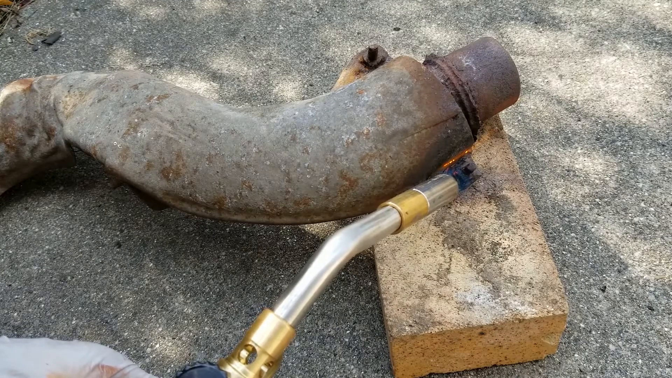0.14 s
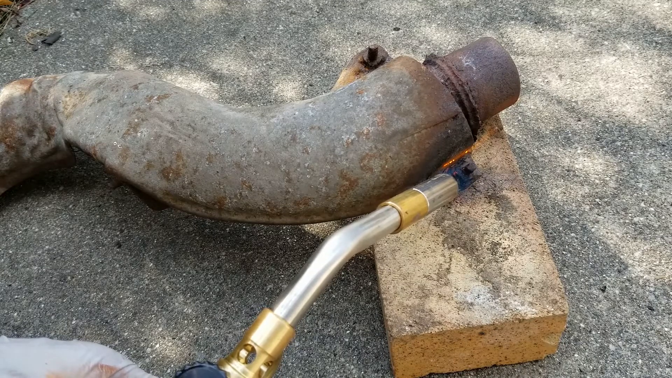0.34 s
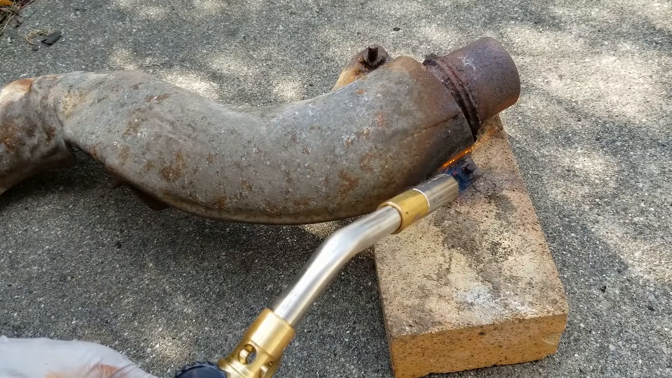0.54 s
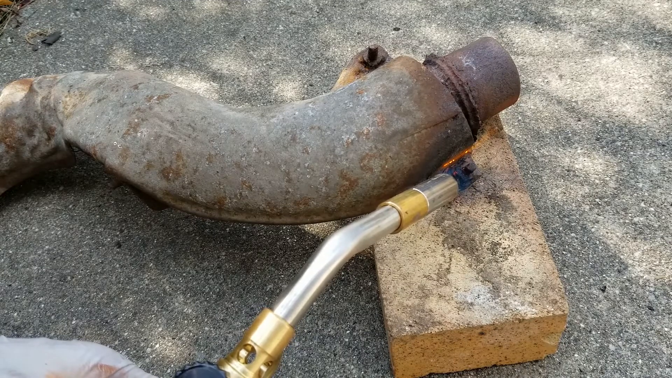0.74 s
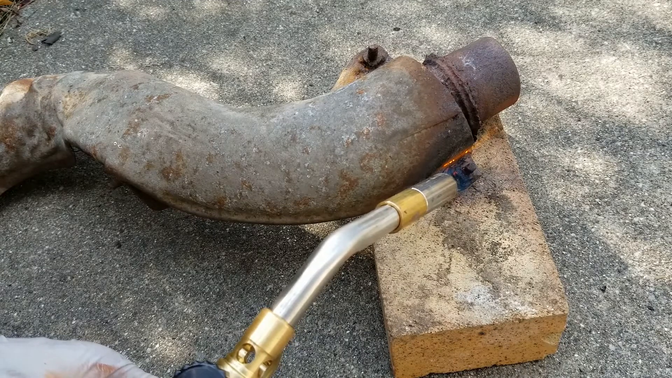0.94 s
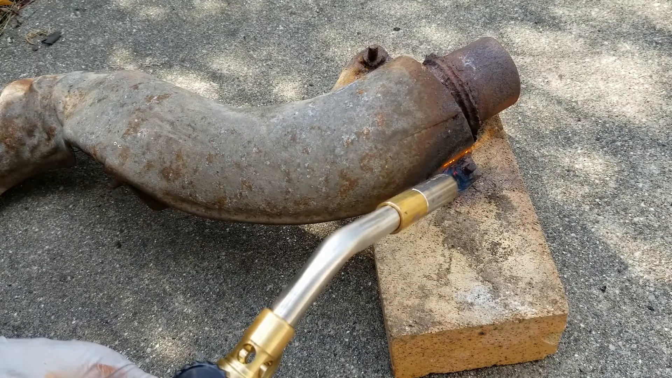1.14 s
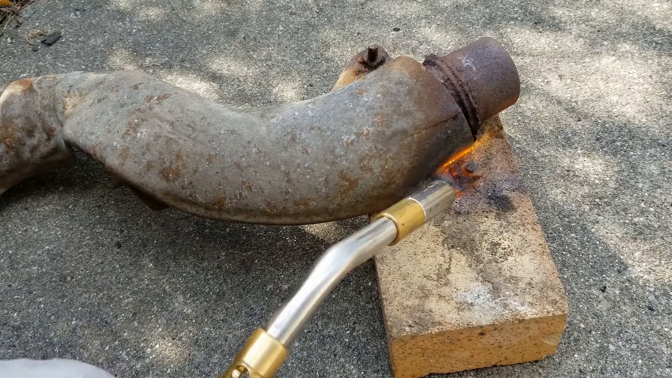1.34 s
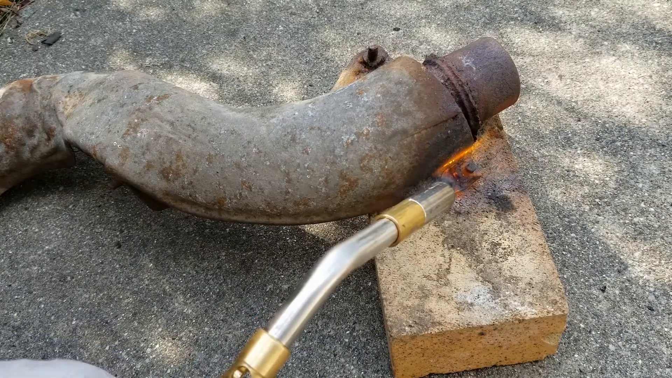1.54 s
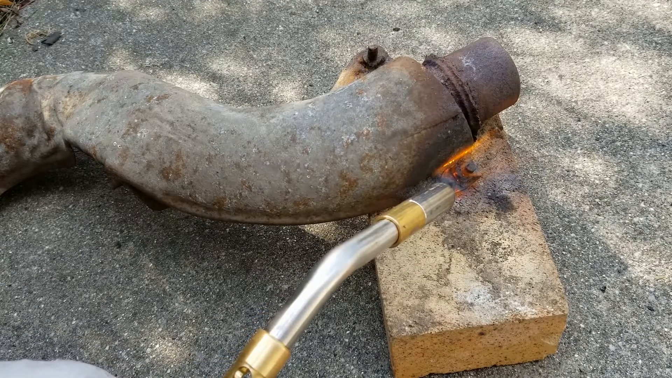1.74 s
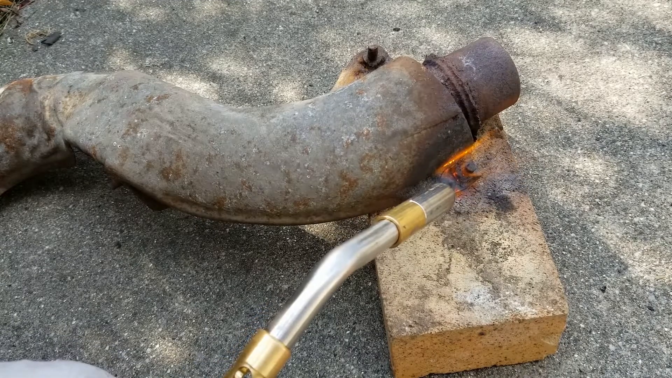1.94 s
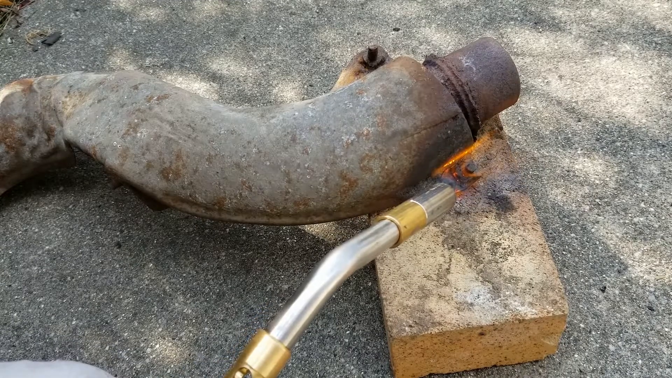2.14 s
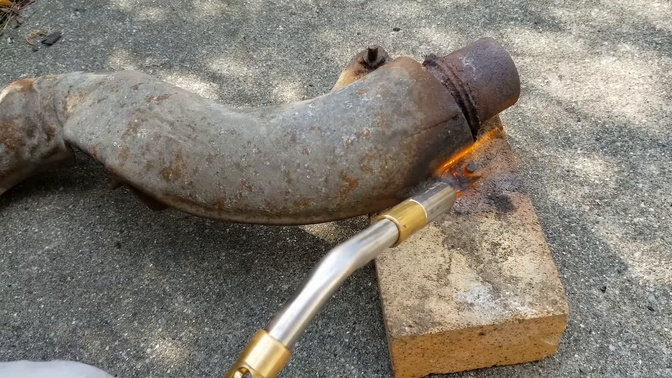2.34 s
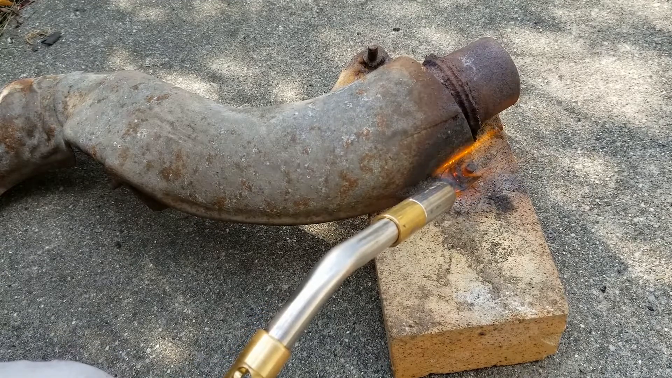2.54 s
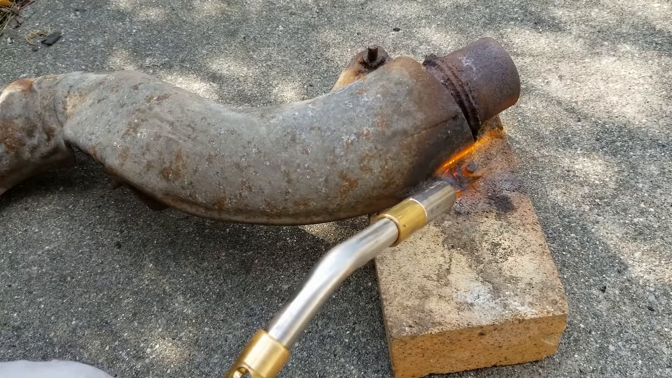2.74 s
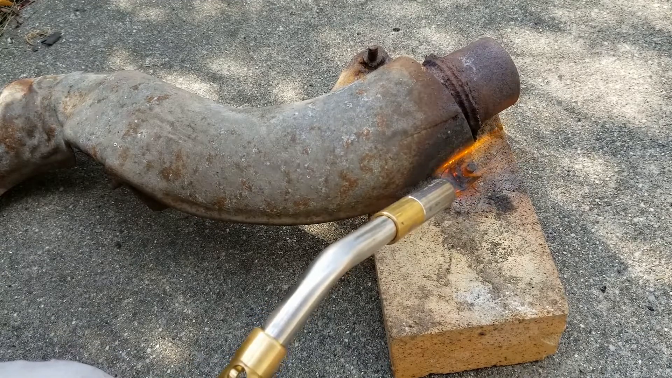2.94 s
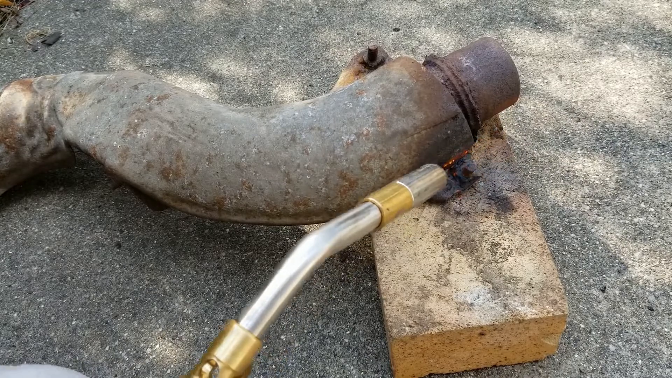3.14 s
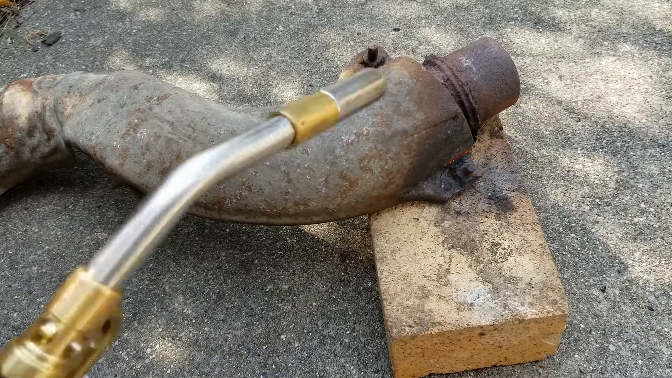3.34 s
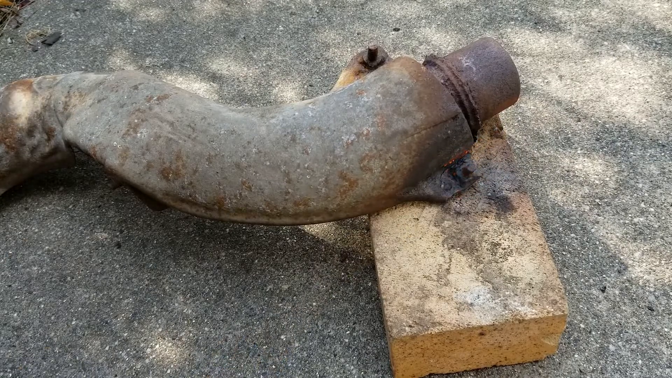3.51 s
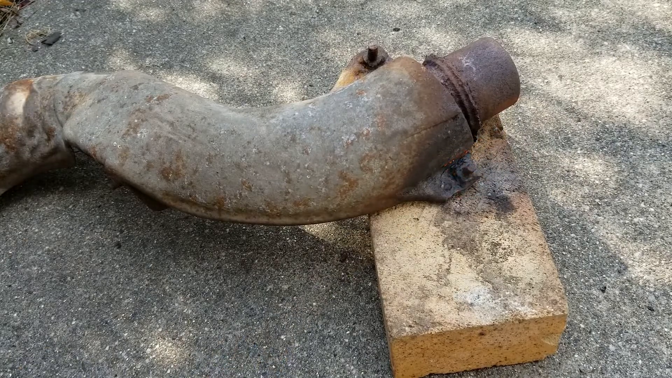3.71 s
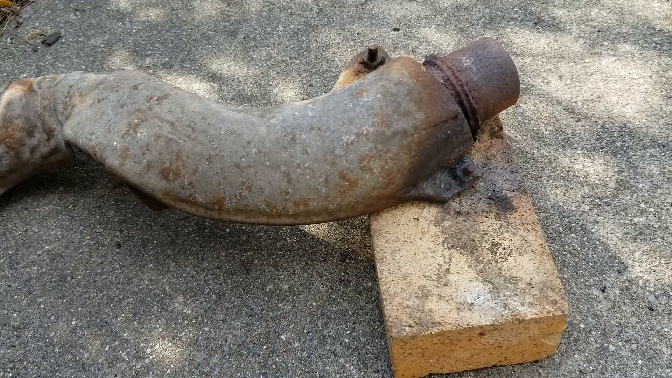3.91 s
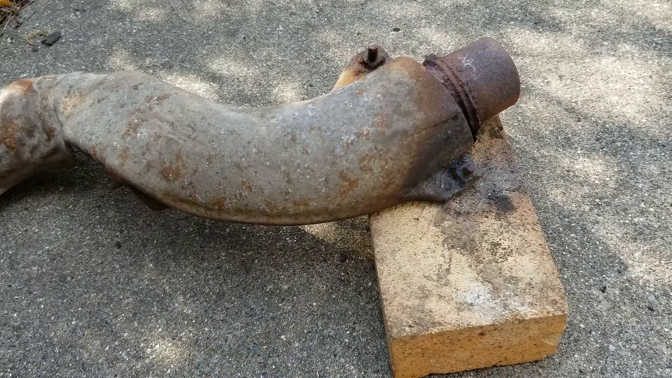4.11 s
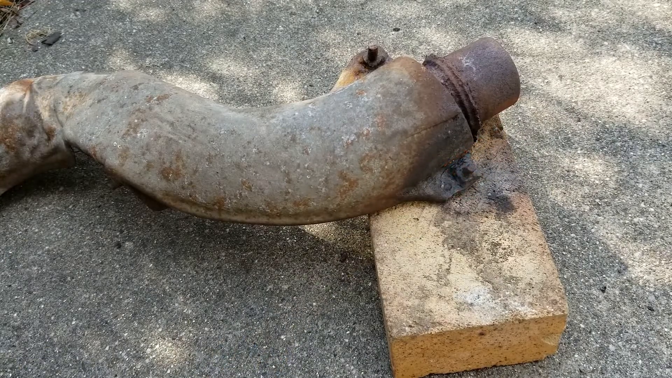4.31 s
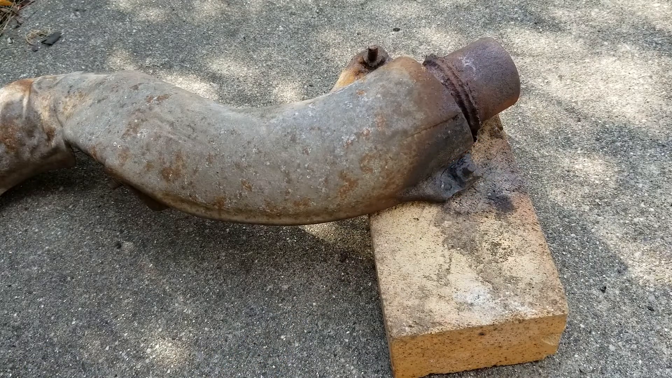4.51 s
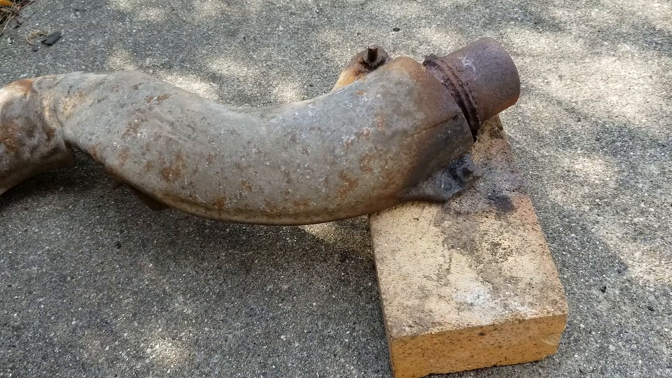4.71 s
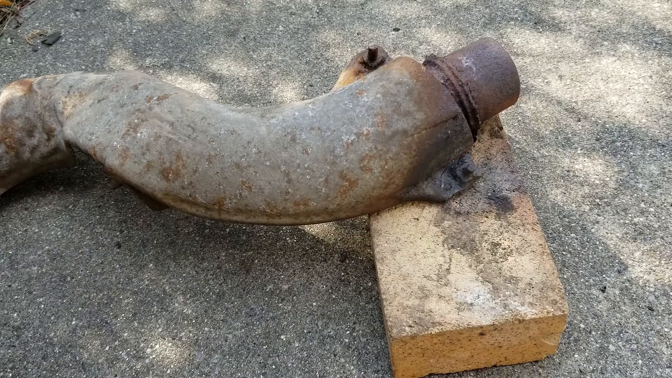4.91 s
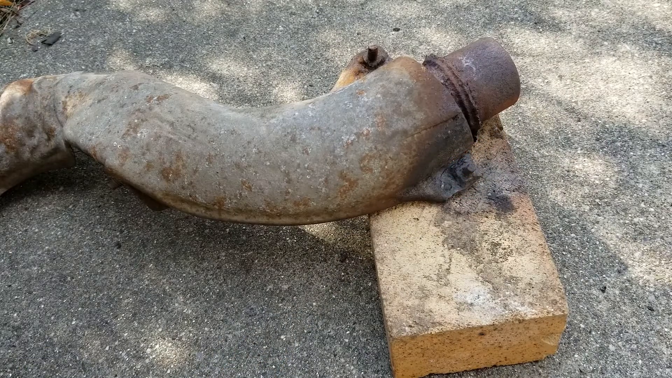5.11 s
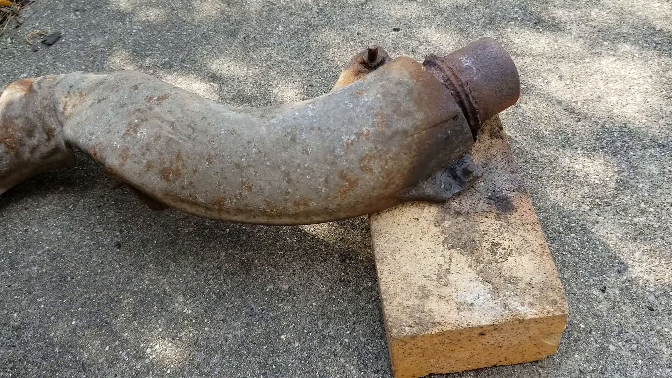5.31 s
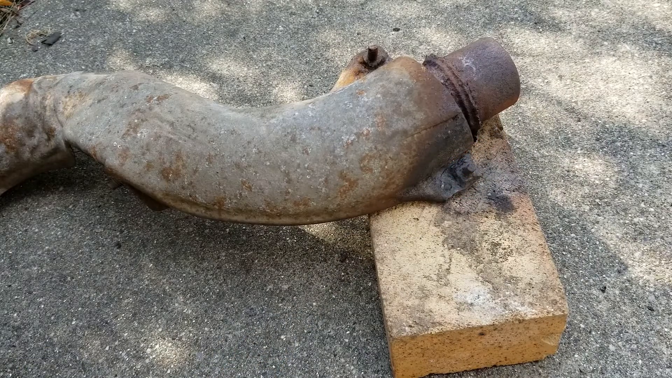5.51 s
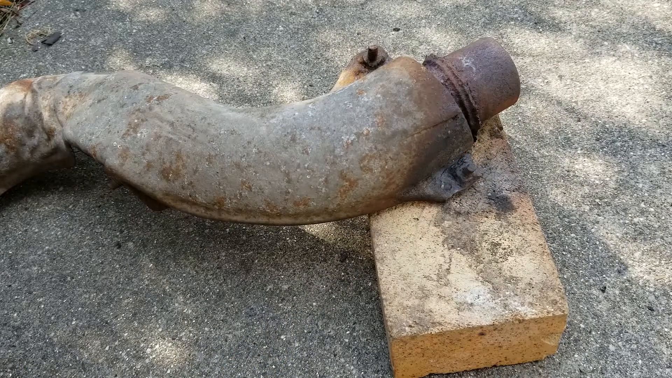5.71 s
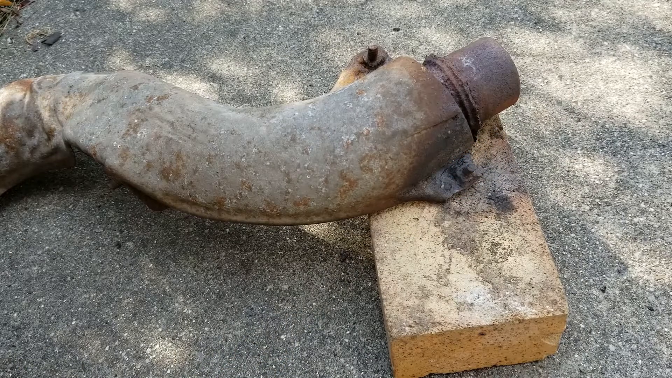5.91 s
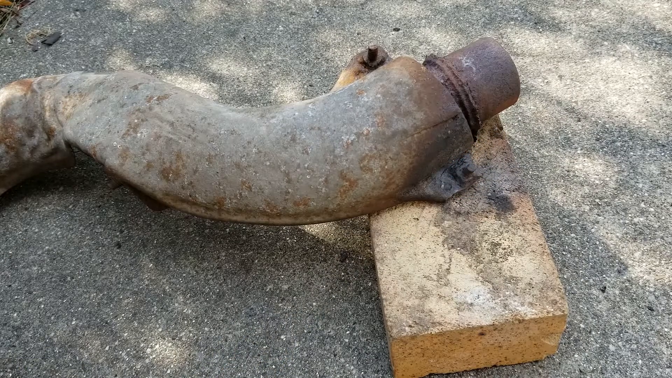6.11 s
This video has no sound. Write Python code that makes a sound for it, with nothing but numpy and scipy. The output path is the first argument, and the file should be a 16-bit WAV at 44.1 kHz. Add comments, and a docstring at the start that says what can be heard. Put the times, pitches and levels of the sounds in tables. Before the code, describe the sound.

From the start, a handheld gas torch burns close to a stereo microphone outdoors, with a hollow roar and a bright, steady hiss. From about 1.4 seconds the hiss shifts in colour as the jet splashes off a rusted bolt, and the roar eases slightly. Just after 3 seconds the valve closes and the sound falls away quickly. The trigger gives a dry click at 3.2 seconds, and the last gas pops in the tube with a very short whistle around 3.3 seconds. A quiet yard remains, with faint chirping insects, a few soft high rustles and the low hum of a distant machine. Between 5.1 and 5.5 seconds the torch is put aside, slightly left, with a few light clacks and a faint scrape. The background swells gently and continues to the end, just after 6 seconds.

```python
"""A handheld gas torch roars and hisses on a rusted bolt, outdoors, close to a stereo microphone.
Turbulent burning rings the burner tube while the gas jet splashes off the steel. The valve closes,
the trigger clicks and the last gas pops in the tube with a short whistle. Insects and a distant
machine remain in the yard, and the torch is put aside with a few light clacks and a scrape."""
import sys
import numpy as np
from scipy import signal
from scipy.fft import rfft, irfft, next_fast_len
from scipy.io import wavfile
from scipy.ndimage import uniform_filter1d, map_coordinates

SR = 44100
rng = np.random.default_rng(int(sys.argv[2]) if len(sys.argv) > 2 else 0)


def output_pcm(signal):
    """Save a mono or channel-first signal as 16-bit PCM at the path in sys.argv[1].

    Samples are clipped to [-1, 1] before scaling.
    """
    pcm = np.clip(np.atleast_2d(signal).T, -1, 1) * 32767
    wavfile.write(sys.argv[1], SR, np.round(pcm).astype(np.int16))


N = 271207

# Far rumble, open air and high rustling. Each row: frequency in Hz, relative level in dB.
RUMBLE_SPECTRUM = [(20, -29.5), (40, -6), (70, 0.5), (130, -3.5), (210, -6), (280, -14), (400, -21.5),
                   (700, -52)]
AIR_SPECTRUM = [(150, 4.5), (600, 0.5), (1250, -2.5), (1700, 3), (2050, -1), (2400, -13), (3500, -17.5),
                (5300, -9.5), (7300, -12.5), (10200, -18.5), (14000, -17), (15700, -15.5)]
RUSTLE_SPECTRUM = [(2000, -8.5), (7000, -13), (10300, -4.5), (11300, -1.5), (14000, -6.5)]
# The air at the two microphones. Each row: frequency in Hz, likeness from -1 to 1.
AIR_LIKENESS = [(200, 0.77), (800, 0.17), (1500, -0.33), (6400, -.1), (7100, 1), (15000, 0.94)]
# Where the air sits. Each row: frequency in Hz, left over right in dB.
AIR_BALANCE = [(950, 0), (1700, 16), (2050, 15), (2500, 3), (5000, 1), (6200, -7.5), (7000, -0.5)]
# A distant machine. Each row: pitch in Hz, rms level in dB before the swell.
MACHINE_HUM = [(57, -54), (118.4, -61)]
# Faint tones far off. Each row: start in seconds, end in seconds, pitch in Hz, typical level in dB.
DISTANT_TONES = [(3.31, 3.846, 295, -63), (5.08, 5.65, 902, -75), (5.417, 6.084, 409.6, -68.5)]
# The insect chorus. Each row: pitch in Hz, width in Hz, relative level in dB.
CHORUS_VOICES = [(8270, 320, -5), (8600, 240, -4.5), (8830, 220, -3.5), (9270, 260, -5)]
# Thin insect trills. Each row: pitch in Hz, typical level in dB once they have risen.
INSECT_TRILLS = [(6130, -79), (7833, -84)]
# One insect's bouts of even chirping. Each row: start in seconds, end in seconds.
CHIRP_BOUTS = [(3.392, 3.95), (4.105, 6.15)]
# A higher insect's buzz. Each row: middle in seconds, length in seconds, level in dB.
INSECT_BUZZES = [(6.1, .24, -67)]
# Faint rustles. Each row: crest in seconds, level in dB, fade in dB per second.
RUSTLE_EVENTS = [(3.42, -64, 109.5), (3.91, -69, 139.5), (4.08, -61, 47), (4.43, -71, 69.5),
                 (6.03, -66.5, 13.5)]

# The torch put aside. Each row: start in seconds, level in dB, low cut in Hz, high cut in Hz,
# left over right in dB, echo in dB, share of the full ring time.
HANDLING_CLACKS = [(5.1112, -34.5, 700, 3000, 4.5, -1, .9), (5.1902, -27, 1350, 15000, 3.5, -2, 0.9),
                   (5.2708, -38.5, 2400, 5000, 4, 1, 0.6), (5.386, -43, 1200, 4800, 5, 0, 0.2),
                   (5.405, -38.5, 2700, 6500, 2, -9, 0.3)]
# The trigger springs back and seats. Each row: start in seconds, level in dB, high cut in Hz.
TRIGGER_CLICKS = [(3.2003, -28, 4800), (3.2014, -26.5, 15040)]
# How the torch body, the trigger's small parts and the popped tube ring.
# Each row: frequency in Hz, relative level in dB, seconds to fall 60 dB.
BODY_MODES = [(1540, -1, .024), (1780, 1.5, .018), (2020, 2.5, .018), (2330, -2, .025), (2580, -6, .03),
              (3000, -8, .016), (4350, -13, .01), (6450, -10, .04), (6900, -9, .05), (8330, -9, .06),
              (10300, -14, .05), (12100, -12, .05), (13900, -16, .03)]
TRIGGER_MODES = [(1900, 2, .008), (2400, -1, .012), (3150, 0, .008), (4400, 0, 0.007), (8200, -4, .008),
                 (10900, -3, .007), (12400, -4, .006), (14900, 0, .007)]
TUBE_MODES = [(1090, 4, 0.016), (2580, -3.5, 0.046), (3720, -4, 0.021), (5200, -9, 0.012),
              (6160, -10.5, 0.0098)]
# The dying flame's pops. Each row: start in seconds, then base levels of thump, ring and puff in dB.
FLAME_POPS = [(3.1497, -36, -48, -45), (3.254, -26.5, -36.5, -44), (3.265, -45, -66, -36),
              (3.2945, -35, -57, -43)]
# The tube's whistles. Each row: start in seconds, length in seconds, middle pitch in Hz, level in dB.
TUBE_WHISTLES = [(3.252, 0.015, 1285, -37), (3.263, 0.036, 1342, -34)]

# The torch moving over the bolt. Each row: time in seconds, tube level in dB, hiss level in dB.
TORCH_LEVELS = [(0.1, -22.5, -31.5), (1.25, -22.5, -30.5), (1.6, -24.5, -33.5), (1.85, -23.5, -33.5),
                (2.1, -27.5, -37.5), (2.25, -25.5, -35), (2.5, -26, -32.5), (2.73, -26.5, -33.5),
                (2.84, -27, -38), (2.95, -30, -37)]
# Brief flares. Each row: middle in seconds, length in seconds, flame boost in dB, gas boost in dB.
FLAME_FLARES = [(1.364, 0.056, 2.5, 2.5), (3.031, 0.0883, 3, 0)]
# The nozzle's aim. Each row: time in seconds, share of the jet that splashes off the steel.
SPLASH_SHARE = [(1.33, 0.07), (1.45, 0.4), (2.15, 0.55), (2.78, 0.6), (2.88, 0.4), (3.03, 0.98)]
# Low roar, free jet and splashing jet. Each row: frequency in Hz, relative level in dB.
ROAR_SPECTRUM = [(20, -40.5), (60, -15.5), (100, -8), (140, -1), (230, 0), (450, -2), (700, -2.5),
                 (1050, -3.5), (1500, -3.5), (2300, -6.5), (2700, -6.5), (3700, -18.5), (4400, -28.5),
                 (8000, -44)]
HISS_SPECTRUM = [(1500, -22.5), (3000, 11.5), (4000, 1), (4750, 10), (5500, 5.5), (6400, 1), (7100, -11.5),
                 (7750, 5.5), (8700, -1), (10700, 1.5), (11500, -9), (12400, -7), (12950, -2), (14000, -8),
                 (15600, -2.5)]
SPLASH_SPECTRUM = [(2000, -23), (3900, 4.5), (4900, 12), (5600, 3), (6700, 4.5), (7400, -0.5), (8400, 2.5),
                   (9500, 4), (10700, -5), (12200, 0), (13400, 0.5), (14200, -2.5), (15600, 0.5)]
# Resonances of the burning gas in the tube. Each row: frequency in Hz, width in Hz, relative level in dB.
BURNER_RESONANCES = [(826, 100, -3), (1295, 55, -4), (1750, 104, 0.5), (1864, 530, -3), (2120, 200, 0.5),
                     (2277, 130, -1.5), (2640, 80, -6), (3380, 99, -17), (3727, 110, -13.5)]
# The torch at the two microphones. Each row: frequency in Hz, likeness from -1 to 1.
TORCH_LIKENESS = [(130, .998), (400, .98), (2200, .96), (3200, .85), (5000, .88), (6100, .5), (7800, .85),
                  (11500, .6), (15000, .7)]
# Where torch and splash sit, the splash mostly right. Each row: frequency in Hz, left over right in dB.
TORCH_BALANCE = [(200, .3), (380, -.5), (700, -3), (1290, 1.7), (2200, -.5), (3050, -6), (3650, 2),
                 (4800, -2), (6100, -9), (7100, -1.5), (8500, -5.5), (10500, .5), (15000, .7)]
SPLASH_BALANCE = [(4000, 2), (4900, -1), (5900, -10), (6800, -12), (8400, -9), (9600, -4), (11000, 3),
                  (13300, -1.5)]
# The torch's phase across the pair. Each row: frequency in Hz, lead of the left microphone in radians.
TORCH_PHASE = [(180, 0), (480, -.45), (950, .1), (1700, -1.1), (2000, -.8), (2600, -1.6), (3050, -1.3),
               (3350, .6), (4200, -1.7), (4800, -2.8), (5350, -3.2), (5900, -4.6), (6500, -6.28)]
# The nozzle's distance from the steel sets the band that cancels between the microphones.
# Each row: time in seconds, frequency in Hz, depth in dB.
NOZZLE_NOTCH = [(1.36, 5440, 0), (1.499, 5170, 6), (1.85, 5270, 6.5), (2.03, 4364, 6.5), (2.4, 4880, 9),
                (2.65, 5070, 8.5), (2.95, 5600, 2)]
# Hollows between nozzle, bolt and pipe ring as the jet sweeps over them. Each row: middle in seconds,
# length in seconds, frequency in Hz, glide in Hz per second, width in Hz, boost in dB.
SWEPT_HOLLOWS = [(1.75, 0.6, 7600, -1, 169, 6), (1.65, .6, 9200, -300, 350, 4),
                 (2.42, 0.53, 5950, 299, 250, 6.5), (2.2, 0.26, 9350, 1400, 200, 5),
                 (2.7, 0.51, 8200, 1200.5, 240, 4.5), (2.5, 0.16, 13400, -1200, 600, 7),
                 (2.2, .3, 3150, -0.5, 350, 4), (2.83, 0.73, 815, 0, 85.2, 5.5),
                 (3.1, 1.6, 2210, -0.5, 140, 3.5), (3.02, 0.1, 4500, 0, 400, 4)]
# Faint random patches mottle the torch's colour. Each row: frequency in Hz, rms depth in dB.
MOTTLE_DEPTH = [(1000, .8), (10000, 1.5)]

RUMBLE_DB, AIR_DB, INSECT_DB = -54.5, -64.5, -72  # base levels before the yard's one slow swell
SWELL_S, SWELL_TAKES_S, AIR_LEADS_S = 5.35, 0.93, 0.16
RUMBLE_SWELL_DB, AIR_SWELL_DB, INSECT_SWELL_DB = 6, 6.5, 6
CHORUS_FLICKER_DB, CHORUS_FLICKERS_PER_S = 3.6, 28
CHIRP_EVERY_S, CHIRP_LENGTH_S = 0.273, 0.104
RUSTLE_RISE_DB_PER_S = 265
SCRAPE_S, SCRAPE_LENGTH_S, SCRAPE_DB = 5.45, 0.15, -64
SCRAPE_HZ, SCRAPE_WIDTH_HZ = 1600, 260
WHISTLE_SAG_HZ_PER_S = 4200
SHUT_S, GAS_LAG_S = 3.059, 0.0336  # the valve closes; gas left in the tube flows a moment longer
FLAME_FALL_DB_PER_S, GAS_FALL_DB_PER_S = 154, 159.5
OUT_S, OUT_TAKES_S, OUT_DROP_DB = 3.153, 0.0083, 18  # the flame goes out
DULL_HZ, DULL_DB_PER_S = 8640, 132  # the slowing jet loses its top above this edge
ROAR_DB, ROAR_SWING_SHARE, ROAR_BURN_SHARE = -25.5, 0.3, 0.72  # the roar partly follows the tube
PIPE_ECHO_MS, NOTCH_WIDTH_HZ = .415, 245
TREMOR_PER_S, TREMOR_PITCH_SHARE, TREMOR_DEPTH_SHARE = 11, .022, .45  # the hand trembles
TOP_HZ = 15850


def amp(db):
    """Decibels to gain."""
    return 10 ** (np.asarray(db) / 20)


def unit(x):
    """Scale to rms 1."""
    return x / np.sqrt(np.mean(x ** 2) + 1e-20)


def along(points, hz):
    """(Hz, value) points read on a log axis."""
    knots_hz, values = np.transpose(points)
    return np.interp(np.log(hz + 1), np.log(knots_hz + 1), values)


def curves(rows):
    """One value per sample for each column after the time."""
    times, *columns = np.transpose(rows)
    return [np.interp(np.arange(N) / SR, times, column) for column in columns]


def wobble(rate):
    """A smooth random curve, rate knots a second."""
    return map_coordinates(rng.standard_normal(int(N * rate / SR) + 4), [np.arange(N) * rate / SR])


def step(middle_s, takes_s):
    """A smooth rise from 0 to 1."""
    return .5 + .5 * np.sin(np.pi * np.clip((np.arange(N) / SR - middle_s) / takes_s, -.5, .5))


def bump(middle_s, length_s):
    """A bell-shaped swell of height 1."""
    return np.exp(-(2 * (np.arange(N) / SR - middle_s) / length_s) ** 2)


def filtered(x, response):
    """Filter x by a complex response of frequency."""
    size = next_fast_len(N + SR // 2)
    return irfft(rfft(x, size) * response(np.fft.rfftfreq(size, 1 / SR)), size)[..., :N]


def colour(points):
    """The response of a (Hz, dB) spectrum."""
    return lambda hz: amp(along(points, hz))


def panned(x, pan_db):
    """Place a sound between the microphones; positive is left."""
    return x * amp([[pan_db / 2], [-pan_db / 2]])


def rush(response, likeness, balance=((1, 0),), lead=((1, 0),)):
    """Noise of rms 1 with a given colour, likeness, balance and phase at the two microphones."""
    def spread(hz):
        angle = np.arccos(np.clip(along(likeness, hz), -1, 1)) / 2
        return np.array([np.cos(angle), np.sin(angle)])

    def microphones(hz):
        tilt = amp(along(balance, hz) / 2) * np.exp(.5j * along(lead, hz))
        pair = np.array([tilt, 1 / tilt])
        return response(hz) * pair / np.linalg.norm(pair, axis=0)
    mid, side = filtered(rng.standard_normal((2, N)), spread)
    return unit(filtered(np.array([mid + side, mid - side]), microphones))


def tones(lines, drift, rate):
    """Steady (Hz, dB rms) tones whose phases wander by about drift radians."""
    t = np.arange(N) / SR
    return sum(amp(db) * np.sqrt(2) * np.sin(2 * np.pi * hz * t + drift * wobble(rate))
               for hz, db in lines)


def walls(x, t60, dull_hz):
    """The yard's walls scatter a different echo to each microphone."""
    t = np.arange(SR // 3) / SR
    tail = rng.standard_normal((2, len(t))) * amp(-60 * t / t60) * (t > .006)
    echo = signal.fftconvolve(x, tail / np.linalg.norm(tail[0]), axes=1)[:, :N]
    return filtered(echo, lambda hz: 1 / (1 + 1j * hz / dull_hz))


def far_tones():
    """Faint wavering tones come and go in the distance."""
    t, out = np.arange(N) / SR, np.zeros(N)
    for start, end, hz, db in DISTANT_TONES:
        fade = np.clip(np.minimum(t - start, end - t) / 0.12, 0, 1)
        out += fade * amp(1.8 * wobble(14)) * tones([(hz, db)], drift=.6, rate=22)
    return out


def yard():
    """Far from the microphones, rumble, a humming machine and open air swell behind the faint tones."""
    swell_db = RUMBLE_SWELL_DB * step(SWELL_S, SWELL_TAKES_S)
    rumble = amp(RUMBLE_DB + swell_db) * rush(colour(RUMBLE_SPECTRUM), [(60, 0.97), (400, 0.82)])
    hum = amp(1.4 * swell_db) * tones(MACHINE_HUM, drift=.45, rate=3.4)
    far = far_tones()
    air_db = AIR_DB + AIR_SWELL_DB * step(SWELL_S - AIR_LEADS_S, SWELL_TAKES_S)
    air = amp(air_db) * rush(colour(AIR_SPECTRUM), AIR_LIKENESS, AIR_BALANCE)
    return rumble + hum + far + air


def insects():
    """A fluttering chorus and thin trills to the right, one caller ahead, a higher buzz to the left."""
    def voice(pitch_hz, width_hz, likeness):
        return rush(lambda hz: np.exp(-((hz - pitch_hz) / width_hz) ** 2), [(pitch_hz, likeness)])

    def flicker():
        pulses_db = CHORUS_FLICKER_DB * np.tanh(wobble(CHORUS_FLICKERS_PER_S) - .5)
        return unit(amp(pulses_db + 2.6 * wobble(18)))
    level_db = INSECT_DB + INSECT_SWELL_DB * step(SWELL_S, SWELL_TAKES_S)
    chorus = sum(amp(level_db + db) * flicker() * voice(hz, width, 0.26)
                 for hz, width, db in CHORUS_VOICES)
    trill_rise = np.interp(np.arange(N) / SR, [4.3, 5.1], [.1, 1])
    trills = trill_rise * amp(1.53 * wobble(7.1)) * tones(INSECT_TRILLS, drift=.9, rate=60)
    chirps = sum(bump(s, CHIRP_LENGTH_S)
                 for start, end in CHIRP_BOUTS for s in np.arange(start, end, CHIRP_EVERY_S))
    caller = amp(level_db + 1 + 1.638 * wobble(18)) * chirps * voice(7890, width_hz=190, likeness=1)
    buzz_level = sum(amp(db) * bump(s, length) for s, length, db in INSECT_BUZZES)
    buzz = buzz_level * voice(11050, width_hz=350, likeness=.6)
    return panned(chorus + trills, pan_db=-8.5) + caller + panned(buzz, pan_db=6.5)


def rustles():
    """Faint high rustles on the left rise quickly, and each fades at its own speed."""
    t = np.arange(N) / SR
    level = sum(amp(db - np.maximum(RUSTLE_RISE_DB_PER_S * (s - t), fade * (t - s)))
                for s, db, fade in RUSTLE_EVENTS)
    flutter = amp(0.79 * wobble(40))
    return panned(level * flutter * rush(colour(RUSTLE_SPECTRUM), [(10000, 0.743)]), pan_db=6.5)


def scrape():
    """The torch slides a little as it settles: uneven catches rub its lowest resonance."""
    catches = unit(amp(4.5 * wobble(70)))
    rub = rush(lambda hz: 1 / (1 + ((hz - SCRAPE_HZ) / SCRAPE_WIDTH_HZ) ** 2), [(SCRAPE_HZ, .4)])
    return panned(amp(SCRAPE_DB) * bump(SCRAPE_S, SCRAPE_LENGTH_S) * catches * rub, pan_db=2)


def contact(start_s, db, modes, thin_hz, dull_hz, ring_share):
    """A sharp crack and a short ring; loose fittings blur each mode, a soft contact dulls it."""
    age, hit, ring = np.arange(SR // 8) / SR, np.zeros(N), 0
    for hz, mode_db, t60 in modes:
        decay = amp(mode_db + rng.normal(0, 2.0) - 60 * age / (t60 * ring_share))
        blur = rng.uniform(0, 2 * np.pi) + np.cumsum(rng.standard_normal(len(age))) * .8 * hz / SR
        ring += decay * np.sin(2 * np.pi * hz * age + blur)
    crack = rng.standard_normal(len(age)) * amp(-18.5 - 60 * age / .018)
    attack = 1 - np.exp(-age / 0.00014)
    hit[round(start_s * SR):][:len(age)] = amp(db) * (ring / np.abs(ring).max() + crack) * attack
    # so small a body radiates no bass
    hit = signal.sosfilt(signal.butter(4, thin_hz, "highpass", fs=SR, output="sos"), hit)
    return signal.lfilter(*signal.butter(2, dull_hz, fs=SR), hit)


def clacks():
    """Left of centre, the torch body knocks as it is put aside; the grip damps some of the contacts."""
    out = np.zeros((2, N))
    for s, db, thin_hz, dull_hz, pan_db, echo_db, ring_share in HANDLING_CLACKS:
        hit = panned(contact(s, db, BODY_MODES, thin_hz, dull_hz, ring_share), pan_db)
        out += hit + amp(echo_db) * walls(hit, t60=0.26, dull_hz=11980)
    return out


def trigger():
    """Close on the right, the released trigger springs back and seats with a dry double click."""
    hits = sum(contact(s, db, TRIGGER_MODES, thin_hz=650, dull_hz=dull_hz, ring_share=0.9)
               for s, db, dull_hz in TRIGGER_CLICKS)
    click = panned(hits, pan_db=-5)
    return click + amp(-16.5) * walls(click, t60=.25, dull_hz=11970)


def whistle():
    """The tube whistles as the flame runs back: each note swells and fades while its pitch sags."""
    t, out = np.arange(N) / SR, np.zeros(N)
    for s, length, hz, db in TUBE_WHISTLES:
        age = np.clip(t - s, 0, length)
        pitch_hz = hz - WHISTLE_SAG_HZ_PER_S * (age - length / 2)
        out += amp(db) * np.sin(np.pi * age / length) * np.sin(2 * np.pi * np.cumsum(pitch_hz) / SR)
    return out


def flame_out():
    """The last gas burns back into the tube: low pops that puff and ring it, and a brief whistle."""
    age, pops = np.arange(SR // 8) / SR, np.zeros(N)
    thump_attack, snap_attack = 1 - np.exp(-age / 0.0015), 1 - np.exp(-age / 0.00041)
    for s, thump_db, ring_db, puff_db in FLAME_POPS:
        thump = -amp(thump_db + 12 - 60 * age / 0.024) * np.sin(2 * np.pi * 175 * age)
        ring = sum(amp(ring_db + db - 60 * age / t60) * np.sin(2 * np.pi * hz * age)
                   for hz, db, t60 in TUBE_MODES)
        low_noise = unit(signal.lfilter(*signal.butter(5, 950, fs=SR), rng.standard_normal(len(age))))
        puff = amp(puff_db - 60 * age / 0.028) * low_noise
        pops[round(s * SR):][:len(age)] += thump * thump_attack + (ring + puff) * snap_attack
    direct = panned(pops + whistle(), pan_db=1.6)
    return direct + amp(-21) * walls(direct, t60=.25, dull_hz=4000)


def valve():
    """Flame and jet gains in dB: brief flares, then a fall as the valve closes and the flame goes out."""
    since_shut = np.arange(N) / SR - SHUT_S
    flare_db = sum(db * bump(s, length) for s, length, db, _ in FLAME_FLARES)
    spurt_db = sum(db * bump(s, length) for s, length, _, db in FLAME_FLARES)
    drop_db = OUT_DROP_DB * step(OUT_S, OUT_TAKES_S)
    burn_db = flare_db - FLAME_FALL_DB_PER_S * np.maximum(since_shut, 0) - drop_db
    gas_db = spurt_db - GAS_FALL_DB_PER_S * np.maximum(since_shut - GAS_LAG_S, 0) - 0.67 * drop_db
    return burn_db, gas_db


def near_echoes(x, count, strength, sway_samples):
    """Echoes from pipe, brick and ground comb the hiss; the teeth slide as the hand moves."""
    out = x.copy()
    for side, direct in enumerate(x):
        for _ in range(count):
            # each path is several times the shortest detour by way of the pipe
            delay = PIPE_ECHO_MS * SR / 1000 * rng.uniform(2.5, 10) + sway_samples * wobble(3)
            out[side] += strength * map_coordinates(direct, [np.arange(N) - delay], order=3)
    return out


def mottle(shape):
    """Random patches of rms 1 over frequency and time."""
    field = rng.standard_normal(shape)
    return unit(uniform_filter1d(uniform_filter1d(field, size=3, axis=0), size=24, axis=1))


def moving_nozzle(x):
    """The jet sweeps over hollows that ring; a sliding band partly cancels between the microphones."""
    hz, t, spectra = signal.stft(x, SR, nperseg=512, noverlap=384)

    def tremor(share):
        return 1 + share * np.interp(t * SR, np.arange(N), wobble(TREMOR_PER_S))

    def band(centre_hz, width_hz):
        strength = tremor(TREMOR_DEPTH_SHARE)
        offset_hz = hz[:, None] - centre_hz * tremor(TREMOR_PITCH_SHARE)
        return strength * np.exp(-(offset_hz / width_hz) ** 2)
    gain_db = sum(db * np.exp(-(2 * (t - s) / length) ** 2) * band(centre + glide * (t - s), width)
                  for s, length, centre, glide, width, db in SWEPT_HOLLOWS)
    times, notch_hz, depth_db = np.transpose(NOZZLE_NOTCH)
    notch_db = np.interp(t, times, depth_db) * band(np.interp(t, times, notch_hz), NOTCH_WIDTH_HZ)
    gain_db += along(MOTTLE_DEPTH, hz)[:, None] * mottle(gain_db.shape)
    spectra -= spectra.mean(axis=0) * (1 - amp(-notch_db))  # cuts only what both microphones share
    return signal.istft(spectra * amp(gain_db), SR, nperseg=512, noverlap=384)[1][:, :N]


def turbulence(response, balance=TORCH_BALANCE):
    """The torch's turbulent noise as it reaches the close pair of microphones."""
    return rush(response, TORCH_LIKENESS, balance, TORCH_PHASE)


def gas_jet(level_db):
    """The jet hisses and splashes off the steel, losing its top as the closing valve slows it."""
    share = curves(SPLASH_SHARE)[0]
    free_jet = np.sqrt(1 - share) * turbulence(colour(HISS_SPECTRUM))
    splash = np.sqrt(share) * amp(1.5) * turbulence(colour(SPLASH_SPECTRUM), SPLASH_BALANCE)
    hiss = amp(level_db + 0.68 * wobble(23)) * (free_jet + splash)
    top = filtered(hiss, lambda hz: 1 - 1 / (1 + (hz / DULL_HZ) ** 10))
    top_lost = 1 - amp(-DULL_DB_PER_S * np.maximum(np.arange(N) / SR - SHUT_S, 0))
    return near_echoes(hiss - top * top_lost, count=4, strength=.16, sway_samples=1.1)


def burner_response(hz):
    """The resonances of the burning gas in the tube, added in power."""
    return np.sqrt(sum(amp(db) ** 2 / (1 + 2 * ((hz - centre) / width) ** 2) ** 2
                       for centre, width, db in BURNER_RESONANCES))


def torch():
    """Close to the microphones, turbulent burning roars and rings the tube while the gas jet hisses."""
    tube_db, hiss_db = curves(TORCH_LEVELS)
    burn_db, gas_db = valve()
    flutter_db = 0.49 * wobble(24.11)  # shared by roar, tube and hiss
    swing_db = tube_db - np.mean(TORCH_LEVELS, axis=0)[1]
    roar_db = ROAR_DB + ROAR_SWING_SHARE * swing_db + ROAR_BURN_SHARE * burn_db
    roar = amp(roar_db + flutter_db + 0.22 * wobble(39.86)) * turbulence(colour(ROAR_SPECTRUM))
    tube = amp(tube_db + burn_db + flutter_db + 0.77 * wobble(60)) * turbulence(burner_response)
    hiss = gas_jet(hiss_db + gas_db + .5 * flutter_db)
    return moving_nozzle(roar + tube + hiss)


def scene():
    """The torch close in front of the microphones, the yard all around."""
    return torch() + flame_out() + trigger() + clacks() + scrape() + rustles() + yard() + insects()


def record(dry):
    """The microphone rig keeps nothing above its band limit."""
    return filtered(dry, lambda hz: hz < TOP_HZ)


dry = scene()
out = record(dry)
output_pcm(out)
```